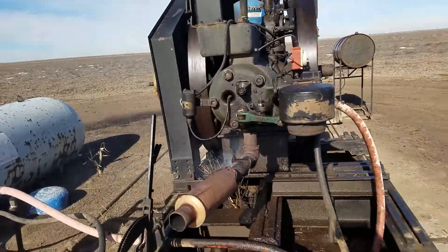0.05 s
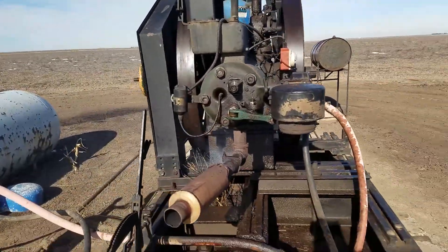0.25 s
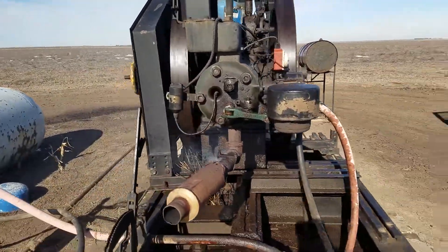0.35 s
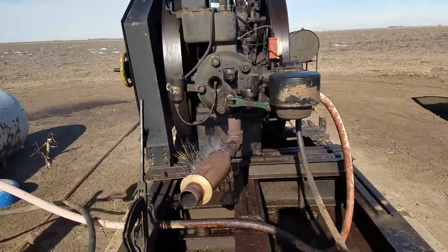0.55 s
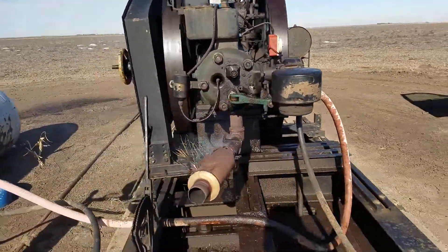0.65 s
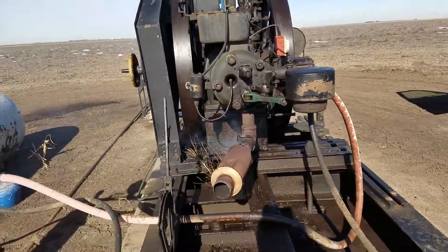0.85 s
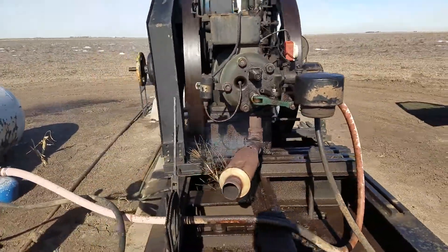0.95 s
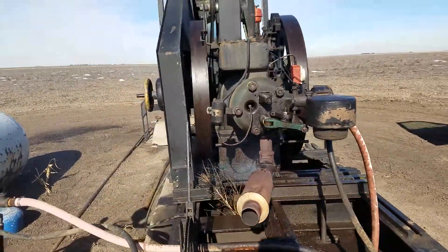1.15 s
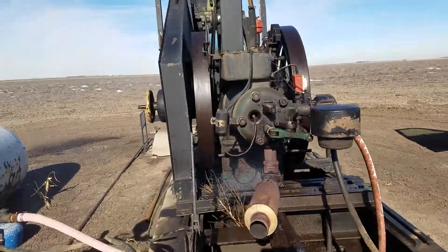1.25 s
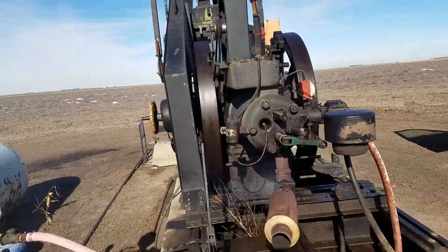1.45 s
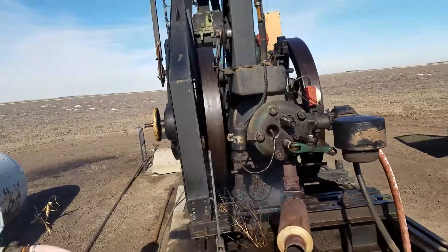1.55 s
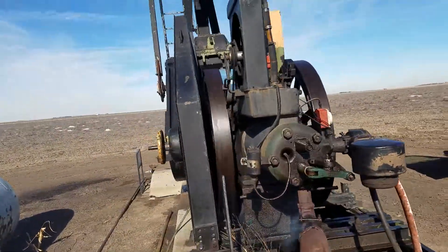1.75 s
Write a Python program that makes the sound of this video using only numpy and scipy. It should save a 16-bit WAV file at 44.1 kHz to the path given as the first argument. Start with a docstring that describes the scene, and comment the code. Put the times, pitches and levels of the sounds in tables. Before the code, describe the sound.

An old single-cylinder engine runs slowly and evenly outdoors, heard from just in front of its exhaust. Sharp pops with a low thump come at about 0.2, 0.5, 0.8, 1.2 and 1.5 seconds, the later ones cracking a little harder. Each trails into a weaker puff and a soft intake hiss. Valve parts knock and tick between the pops, over a quiet, continuous flywheel rumble.

```python
"""An old single-cylinder engine runs slowly on open prairie, heard from just in front of its exhaust.
It fires about three times a second. Each firing is a thump and a sharp blast of gas through the
ringing pipe, then a weaker surge as the piston pushes out the rest. The valve gear knocks and ticks,
the air intake gulps and hisses, and the flywheel and belts rumble underneath."""
import sys
import numpy as np
from scipy import signal
from scipy.fft import rfft, irfft, next_fast_len
from scipy.io import wavfile

SR = 44100
rng = np.random.default_rng(int(sys.argv[2]) if len(sys.argv) > 2 else 0)


def transcribe(signal):
    """Save signal, clipped to [-1, 1], as a 16-bit WAV file at the path in sys.argv[1]."""
    frames = np.atleast_2d(signal).T
    limited = np.clip(frames, -1, 1)
    pcm = np.round(limited * 32767).astype(np.int16)
    wavfile.write(sys.argv[1], SR, pcm)


N = 79380
TIME = np.arange(N) / SR
FFT_SIZE = next_fast_len(2 * N)
FREQ = np.arange(FFT_SIZE // 2 + 1) * SR / FFT_SIZE

# The engine's firings. Each row: start in seconds, blast level in dB, treble boost in dB, opening
# crack in dB, pitch in Hz that happens to stand out in this blast's noise, surge in dB, intake in dB.
# All levels are relative.
FIRINGS = [(-.118, 0, 0, 0, 1740, 2, 0), (.2048, .5, 4.5, -22, 1650, -3.5, -0.5),
           (.5270, -1, 1.5, -20, 1890, -4, -0.5), (0.848, 1, -1.5, -7, 1124, -3.5, 0),
           (1.1683, -0.5, 1.5, 3, 794, -2, 3), (1.4870, 0, 3, -3, 2160, -2.5, 2)]
# The tone of the blast. Each row: frequency in Hz, level in dB.
BLAST_TONE = [(60, -38), (250, -4.5), (400, -3), (650, -6), (1300, -5.5), (2700, -1), (4000, -3.5),
              (5200, -8), (7000, -5.5), (8400, 4), (9600, -5.5), (13000, -20), (16000, -22.5)]
# The pitches at which the exhaust pipe rings. Each row: pitch in Hz, width in Hz, boost in dB.
PIPE_RINGS = [(392, 83, 7.5), (768, 62, 11), (976, 36, 12), (1144, 70, 9), (1256, 61, 7.5), (1543, 82, 10),
              (1725, 120, 11.5), (2210, 77, 7.5), (2443, 78, 8), (2670, 130, 4.5), (2976, 250, 7),
              (3650, 23, 8.5), (4076, 160, 6.5), (6140, 250, 8), (7950, 170, 3)]

def exhaust_blast():
    """The valve leaks, then opens fully, and the gas rushes out through the ringing pipe."""
    leak_s, attack_s, hold_s = .0045, .0007, .0078
    grow_db, release_db_per_s = 4, 966
    out, gas = 0, turbulence(rough_db=3)
    for start, db, treble_db, crack_db, standout_hz, _, _ in FIRINGS:
        age = TIME - start
        leak = from_db(-19.5) * ((age > -leak_s) & (age < attack_s))
        flow_db = np.minimum(grow_db * (age / hold_s - 1), -release_db_per_s * (age - hold_s))
        flow = np.clip(age / attack_s, 0, 1) * from_db(flow_db)
        crack = from_db(crack_db) * (age > 0) * swell(start + .001, rise=6000, fall=6000)
        burst = gas * (np.hypot(flow, crack) + leak)
        peaks = list(PIPE_RINGS) + [(standout_hz, 103, 10.5)]
        out = out + from_db(db - 10.5) * colour(burst, BLAST_TONE, peaks, treble_db)
    return out

# The pipe's low notes. Each row: pitch in Hz, level in dB, seconds to fade by 60 dB.
THUMP_NOTES = [(96, -18.5, 0.031), (163.6, -22, 0.097), (336, -17, 0.028), (363.6, -17.5, 0.037)]

def exhaust_thump():
    """A jump in pressure just ahead of each blast rings the pipe's low notes."""
    return soft_thud([(start - .0012, 0) for start, *_ in FIRINGS], THUMP_NOTES)

# The tone of the surge. Each row: frequency in Hz, level in dB.
SURGE_TONE = [(60, -17), (140, 3.5), (220, -0.5), (350, 3), (600, -6.5), (1600, -9), (3000, 3),
              (5800, -6.5), (8200, -0.5), (11000, -13.5), (16000, -26)]
# The notes of its low push. Each row: pitch in Hz, level in dB, seconds to fade by 60 dB.
PUSH_NOTES = [(134, -16, 0.056), (350, -16, 0.015)]

def exhaust_surge():
    """The rising piston drives out the rest of the gas, with a soft low push."""
    pushes = [(start + .045, db) for start, *_, db, _ in FIRINGS]
    flow = sum(from_db(db) * swell(peak_s, rise=1295.5, fall=1042) for peak_s, db in pushes)
    rush = colour(turbulence(rough_db=1.5) * flow, SURGE_TONE, PIPE_RINGS)
    return from_db(-16.5) * rush + from_db(-9) * soft_thud(pushes, PUSH_NOTES)

# The tone of the echo. Each row: frequency in Hz, level in dB.
ECHO_TONE = [(50, -12), (110, -1.5), (220, -1), (800, -1), (1500, -5.5), (2800, -1.5), (5500, -14.5),
             (8200, -15.5), (15000, -31)]

def scattered_echo():
    """The machine and the ground scatter each blast back as a dull tail."""
    tail = sum(fade(start, fall=174) for start, *_ in FIRINGS)
    return from_db(-25.5) * colour(turbulence(rough_db=3.5) * tail, ECHO_TONE)

# Puffs of air. Each row: peak in seconds after a firing, level in dB, rise and fall in dB per second.
PUFFS = [(.108, -31.5, 1100, 850), (0.15, -35.5, 1700, 603), (0.186, -40.5, 900, 553)]
# The tones of the intake's hiss and throb. Each row: frequency in Hz, level in dB.
HISS_TONE = [(60, -22), (120, -1), (250, -6), (1200, -2.5), (2700, 6), (4000, -4), (4900, -1), (6400, -6),
             (8200, 3), (10000, -7), (16000, -23)]
THROB_TONE = [(30, -14), (70, -2.5), (125, 2), (200, -4), (330, -4.5), (600, -5), (1500, -8.5), (2700, -4),
              (4200, -20), (7000, -35), (12000, -38)]
# The notes of the gulp. Each row: pitch in Hz, level in dB, seconds to fade by 60 dB.
GULP_NOTES = [(114, -32.5, 0.069), (169, -35, 0.097), (319, -26, 0.031)]

def air_intake():
    """The engine breathes in: a low gulp, then three hissing puffs over a throb of rushing air."""
    gulp = soft_thud([(start + .0925, 0) for start, *_ in FIRINGS], GULP_NOTES)
    stroke = sum(swell(start + .16, rise=161, fall=161) for start, *_ in FIRINGS)
    throb = from_db(-37.5) * colour(turbulence(rough_db=-2.5) * stroke, THROB_TONE)
    puffs = sum(from_db(db + puff_db) * swell(start + delay, rise, fall)
                for start, *_, db in FIRINGS for delay, puff_db, rise, fall in PUFFS)
    hiss = colour(turbulence(rough_db=4) * puffs, HISS_TONE)
    return gulp + throb + hiss

# Knocks of the parts that work the valves. Each row: start in seconds, chatter in dB, ring in dB.
KNOCKS = [(.008, -22, -13), (0.026, -11, -8), (0.297, -1, 0.5), (0.3102, -1, -20), (0.3364, -9, -8),
          (0.353, 0.5, -18), (0.377, -9, -10), (0.6176, 0.5, -2), (0.629, 0, -8), (.656, -13, -21),
          (0.675, -9, -16), (0.9388, -14, 2), (0.951, -6, -5), (0.9789, -19, -11), (0.996, 3, -13),
          (1.018, -18, -8.5), (1.258, 1, 3), (1.297, -8, -3), (1.314, -8, -10), (1.349, -17, -10),
          (1.5797, 3, 0), (1.595, 6, -1), (1.625, 2, -9), (1.6455, 0.5, -4), (1.668, -1.5, -8.5)]
# The tone of the chatter. Each row: frequency in Hz, level in dB.
CHATTER_TONE = [(150, -10), (600, 9), (1500, -4), (2700, -4.5), (3700, 4), (6500, -11), (8300, -8),
                (10000, -21), (16000, -16)]
# The notes of the iron parts. Each row: pitch in Hz, level in dB, seconds to fade by 60 dB.
IRON_NOTES = [(2396, -27, 0.023), (4840, -28, 0.029), (4980, -29.5, 0.013), (8960, -49, 0.0048)]

def valve_gear():
    """Parts meet with a short chatter, bounce once and set the iron ringing."""
    hits = [(start, db) for start, _, db in KNOCKS]
    bounces = [(start + .002 * rng.uniform(.704, 1.3), db - 12) for start, db in hits]
    bursts = sum(from_db(db) * fade(start, fall=2400) for start, db, _ in KNOCKS)
    chatter = from_db(-31) * colour(turbulence(rough_db=1) * bursts, CHATTER_TONE)
    return chatter + ringing(hits + bounces, IRON_NOTES)

# The tone of the rumble. Each row: frequency in Hz, level in dB.
RUMBLE_TONE = [(25, -41), (60, -38), (105, -4.5), (170, -10), (300, 1), (500, 1.5), (850, 2), (1500, -4),
               (2800, -10.5), (4200, -19.5), (6500, -26), (8500, -20), (11000, -31.5), (16000, -38)]
# The hum of the engine's frame. Each row: pitch in Hz, width in Hz, boost in dB.
FRAME_HUM = [(105, 11.8, 5), (796, 71, 2.5)]

def flywheel():
    """The wheel and belts rumble, quietest while the piston squeezes the gas before a firing."""
    swing_db, loudest_at = 1.5, .35  # loudest about a third of the way through a cycle
    starts = [start for start, *_ in FIRINGS]
    starts.append(2 * starts[-1] - starts[-2])  # where the last cycle ends
    cycles = np.interp(TIME, starts, np.arange(len(starts)))
    level_db = -42 + swing_db * np.cos(2 * np.pi * (cycles - loudest_at))
    return from_db(level_db) * colour(turbulence(rough_db=-1.9), RUMBLE_TONE, FRAME_HUM)

def from_db(db):
    """Turn decibels into a number to multiply a sound by."""
    return 10 ** (np.asarray(db) / 20)

def swell(peak_s, rise, fall):
    """A loudness curve that peaks at peak_s; rise and fall are in dB per second."""
    return from_db(np.minimum(rise * (TIME - peak_s), -fall * (TIME - peak_s)))

def fade(start, fall):
    """A loudness curve that jumps up at start, then drops by fall dB per second."""
    return (TIME > start) * from_db(-fall * abs(TIME - start))

def ringing(hits, notes):
    """Each hit (start in seconds, level in dB) sets off a group of fading notes."""
    out = np.zeros(N)
    for start, db in hits:
        near = (TIME > start) & (TIME < start + .2)
        age = TIME[near] - start
        for hz, note_db, fade_s in notes:
            out[near] += from_db(db + note_db - 60 * age / fade_s) * np.sin(2 * np.pi * hz * age)
    return out

def soft_thud(pulses, notes):
    """Soft pulses of pressure ring low notes, with the treble and deepest bass turned down."""
    dull = signal.sosfilt(signal.butter(2, 860, fs=SR, output="sos"), ringing(pulses, notes))
    return signal.sosfilt(signal.butter(2, 84, "high", fs=SR, output="sos"), dull)

def curve(rows, column=1):
    """Join the points in one column of a table to get a value for every frequency."""
    rows = np.array(rows)
    return np.interp(np.log(FREQ + 1), np.log(rows[:, 0]), rows[:, column])

def colour(sound, tone, peaks=(), treble_db=0):
    """Give a sound a broad tone, pitches that stand out of it, and more or less treble."""
    bass_cut_hz, treble_hz = 36, 4730
    gain = from_db(curve(tone)) * FREQ ** 3 / (FREQ ** 3 + bass_cut_hz ** 3) + 1e-6
    boost = sum((from_db(db) ** 2 - 1) / (1 + (2 * (FREQ - hz) / width) ** 2) ** 1.5
                for hz, width, db in peaks)
    gain *= np.sqrt(1 + boost)
    gain /= np.sqrt(np.mean(gain ** 2))
    gain *= from_db(treble_db * FREQ ** 4 / (FREQ ** 4 + treble_hz ** 4))
    # Build the filter so that it rings after a sound, never before it.
    cepstrum = irfft(np.log(gain), FFT_SIZE)[:FFT_SIZE // 2]
    cepstrum[1:] *= 2
    response = np.exp(rfft(cepstrum, FFT_SIZE))
    return irfft(rfft(sound, FFT_SIZE) * response, FFT_SIZE)[..., :N]

# The left and right microphone openings. Each row: frequency in Hz, left minus right level in dB,
# typical phase gap (how far the waves are out of step) in radians, unshared noise in dB.
MIC_OPENINGS = [(100, -1, 0.34, -22), (447, -1.5, 0.11, -17.5), (1190, -1.9, 0.19, -12),
                (2110, -2.5, 0.72, -11), (3360, -6, 0.96, -6), (5740, 3, 1.3, -10.5),
                (8800, 0.7, 1.54, -7.5), (15200, 5, 1.74, -17)]

def turbulence(rough_db):
    """Lumpy gas noise, mostly alike left and right; the further rough_db is from 0, the lumpier."""
    shared, unshared = rfft(rng.standard_normal((2, N)), FFT_SIZE)
    unshared *= from_db(curve(MIC_OPENINGS, column=3))
    noise = irfft([shared + unshared, shared - unshared], FFT_SIZE)[:, :N]
    smoother = signal.butter(2, 540, fs=SR, output="sos")
    flutter = signal.sosfilt(smoother, rng.standard_normal(N + SR))[SR:]
    noise *= from_db(rough_db * flutter / flutter.std())
    return noise / noise.std()

def scene():
    """The whole engine reaches left and right at different levels and a little out of step."""
    exhaust = exhaust_blast() + exhaust_thump() + exhaust_surge() + scattered_echo()
    engine = exhaust + air_intake() + valve_gear() + flywheel()
    sides, ripple_hz = np.array([[.5], [-.5]]), 1284
    phase_gap = curve(MIC_OPENINGS, column=2) * np.sqrt(2) * np.sin(2 * np.pi * FREQ / ripple_hz)
    stereo = from_db(sides * curve(MIC_OPENINGS)) * np.exp(1j * sides * phase_gap)
    return irfft(rfft(engine, FFT_SIZE) * stereo, FFT_SIZE)[:, :N]

def record(dry):
    """Round off the loudest peaks and cut the highest treble."""
    ceiling, cutoff_hz = 1.14, 16000
    rounded = ceiling * np.tanh(dry / ceiling)
    return signal.sosfilt(signal.ellip(10, .2, 80, cutoff_hz, fs=SR, output="sos"), rounded)

dry = scene()
out = record(dry)
transcribe(out)
```